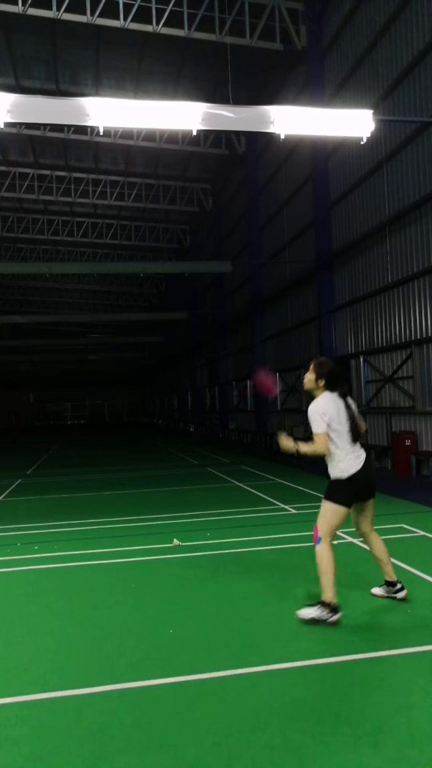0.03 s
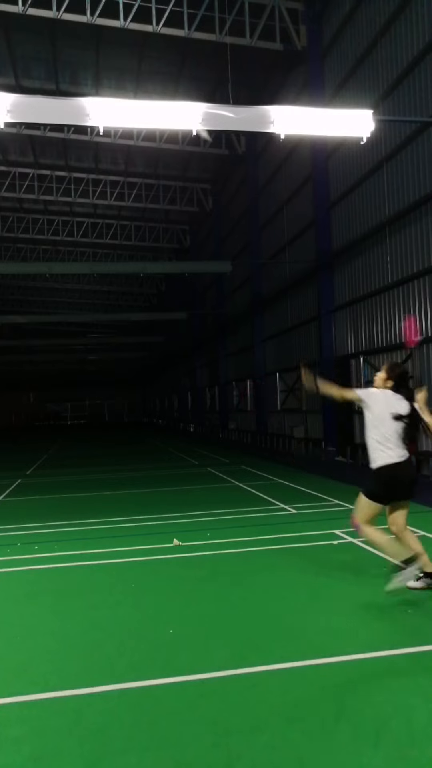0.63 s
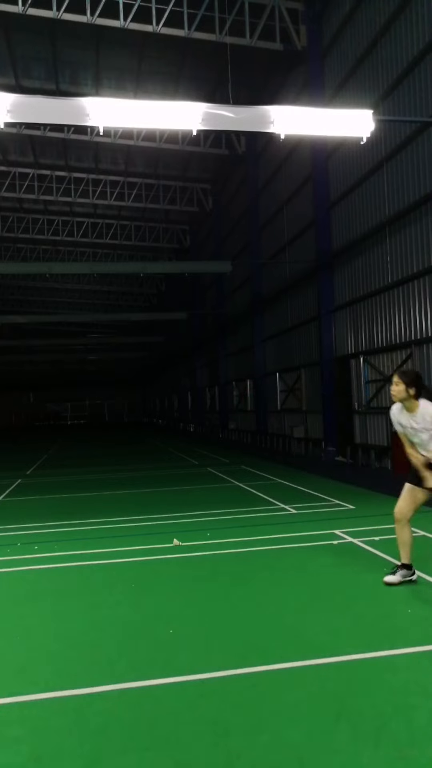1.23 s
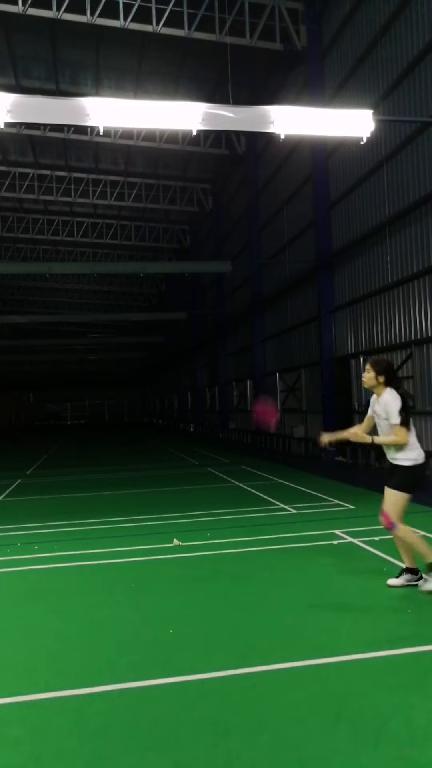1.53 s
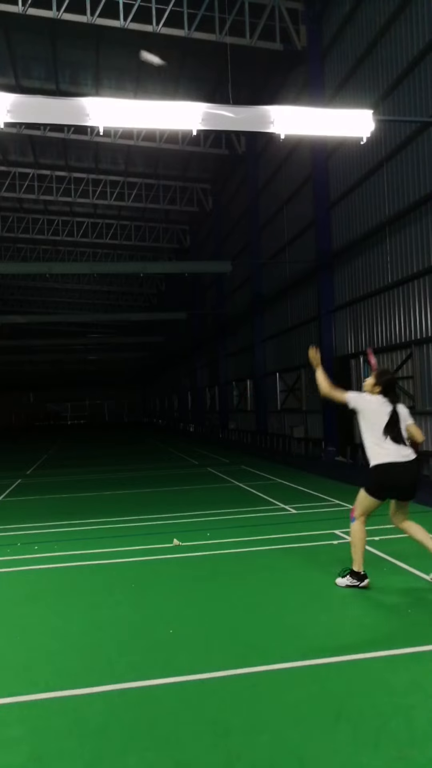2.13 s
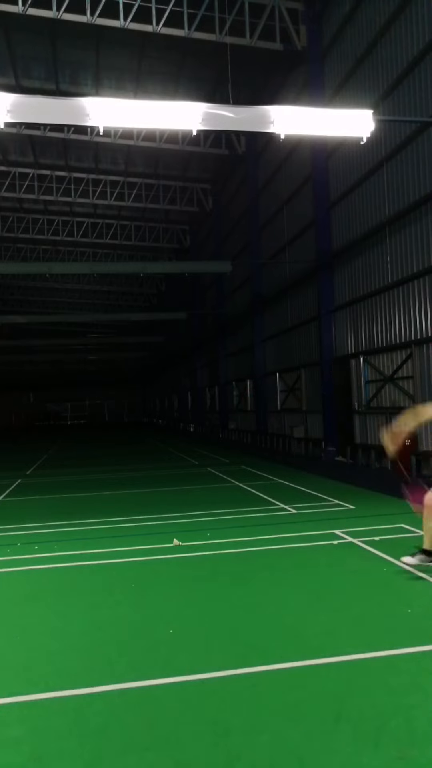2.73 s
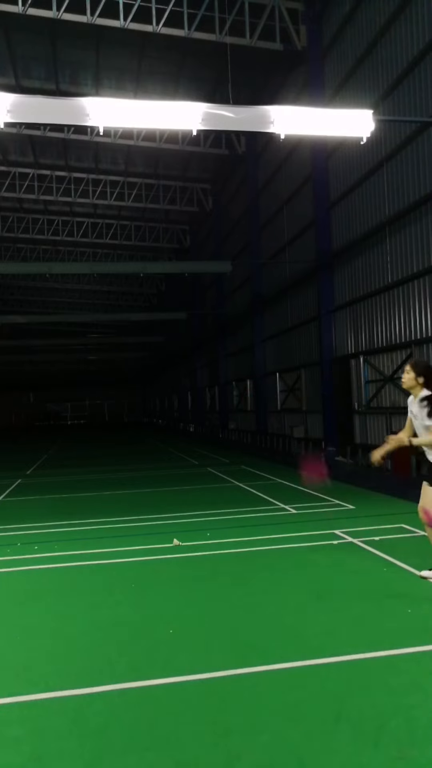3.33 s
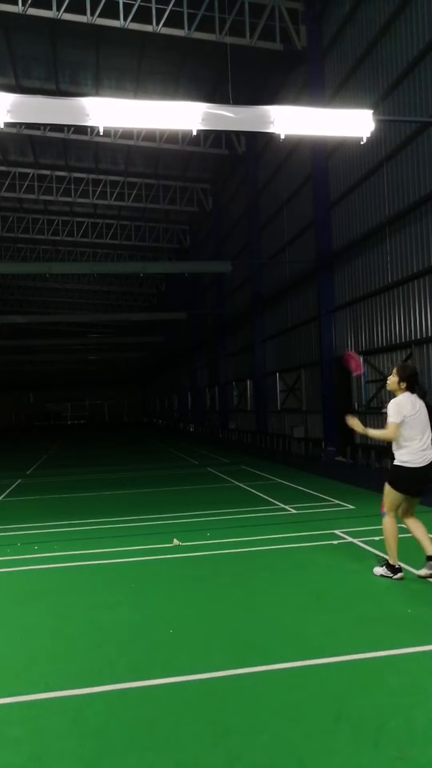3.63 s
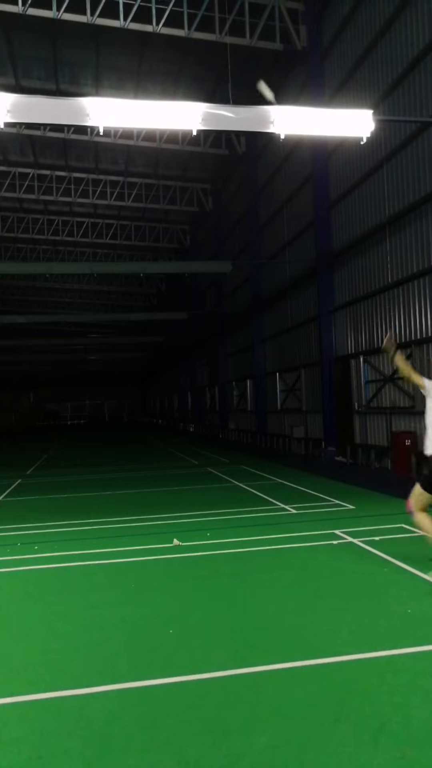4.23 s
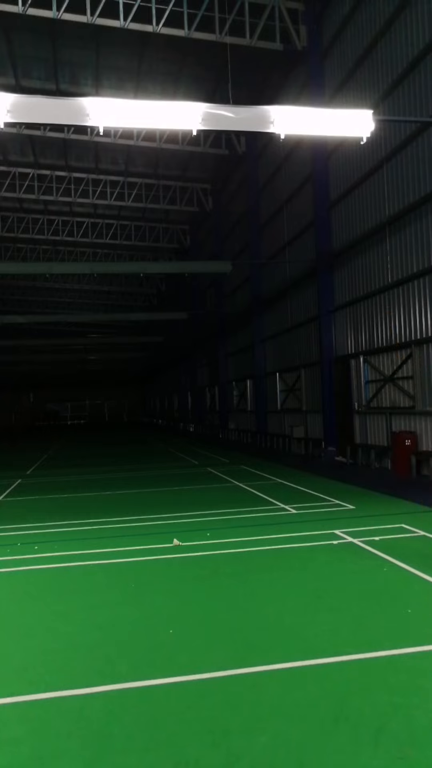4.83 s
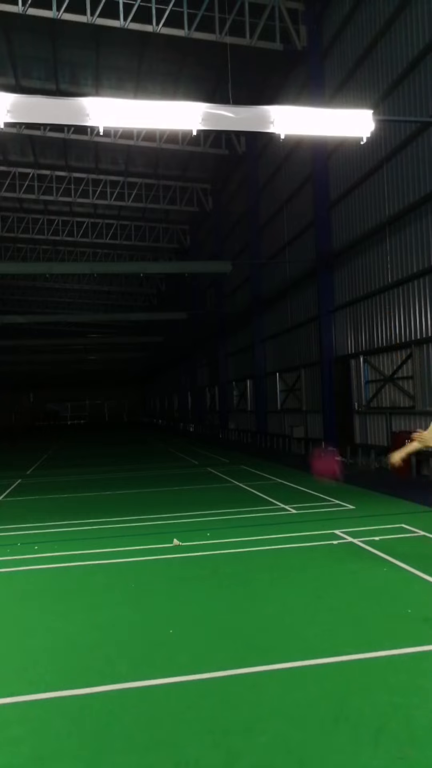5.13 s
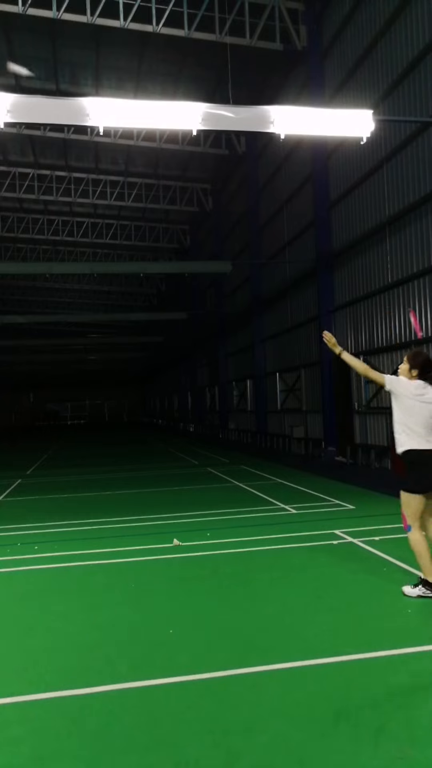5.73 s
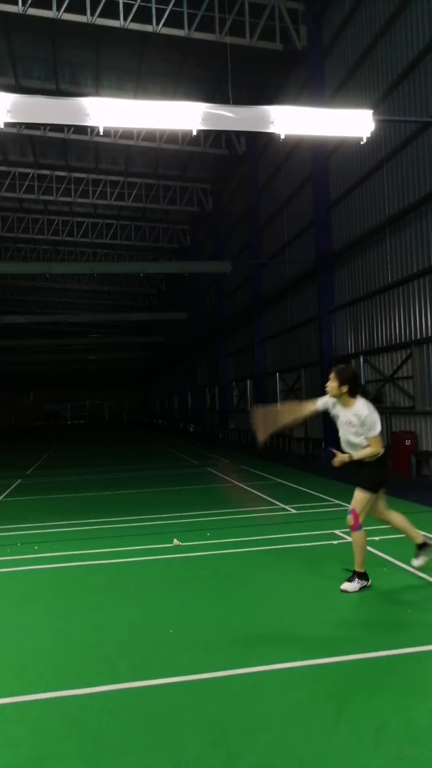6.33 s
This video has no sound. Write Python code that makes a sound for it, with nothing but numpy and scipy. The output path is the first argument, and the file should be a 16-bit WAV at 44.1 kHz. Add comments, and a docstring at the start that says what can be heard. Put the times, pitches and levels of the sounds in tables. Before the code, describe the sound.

Badminton practice in a large, reverberant indoor hall, over faint, steady, low room noise. It opens on the fading echo of an earlier hit and a light shoe scuff. A racket close to the microphone, slightly to the right, smashes a shuttlecock at about 1.0, 2.7, 4.6 and 6.4 seconds, the third loudest. Each is a sharp crack with a slight string ping, a quick slap off the walls and an echo lasting around two seconds. Softer, duller hits come from a distant racket at about 1.4, 3.2 and 5.1 seconds, the middle one with a thin ring. Faint, far-off shoe squeaks sound around 1.6 and 2.1 seconds. Spent shuttlecocks tap the court lightly, twice near 2.4 seconds and more faintly at 4.4. Quiet shoe scuffs and dull footfalls fall between the strokes, mainly around 3.3 seconds and from 5 to 6 seconds.

```python
"""Badminton smash practice in a steel-clad hall.

Two microphones stand near the court, the player a little to their right. From afar a feeder lifts
shuttles; close by, the racket swishes, cracks on the cork and its strings ping. Floor and walls slap
back and the big hall rings on. Shoes scuff and squeak, footfalls and echoes thud dully, and spent
shuttles tap the court, over a faint room noise."""
import sys
import numpy as np
from scipy import signal
from scipy.fft import rfft, irfft
from scipy.io import wavfile
from scipy.ndimage import uniform_filter1d

SR = 44100
rng = np.random.default_rng(int(sys.argv[2]) if len(sys.argv) > 2 else 0)


def digitize_waveform(pressure):
    """Quantize a signal to 16-bit integers and store it at the path in sys.argv[1].

    Rows of a 2-D input are taken as channels; values are limited to [-1, 1].
    """
    field = np.atleast_2d(pressure).T
    bounded = np.clip(field, -1, 1)
    quanta = np.round(bounded * 32767).astype(np.int16)
    wavfile.write(sys.argv[1], SR, quanta)


N = 281799
T = np.arange(SR // 2) / SR   # time within one stroke
LEAD_S = .06   # contact comes this far into a stroke


def from_db(db):
    """Decibels to gain."""
    return 10 ** (np.asarray(db) / 20)


def at_hz(curve, hz):
    """A curve's value, read on a log-frequency axis."""
    freqs, values = np.transpose(curve)
    return np.interp(np.log(hz + 1), np.log(freqs), values)


def add(out, sound, start_s):
    """Mix a sound into both channels from start_s."""
    at = int(round(start_s * SR))
    first, last = max(at, 0), min(at + sound.shape[1], N)
    if last > first:
        out[:, first:last] += sound[:, first - at:last - at]


def coloured(x, spectrum):
    """Causal (minimum-phase) filter with the given spectrum."""
    n = 2 * len(x)
    gain = from_db(at_hz(spectrum, np.fft.rfftfreq(n, 1 / SR)))
    cepstrum = irfft(np.log(gain))
    cepstrum[1:n // 2] *= 2
    return irfft(rfft(x, n) * np.exp(rfft(cepstrum[:n // 2], n)))[:len(x)]


def lowpass(x, hz):
    """Take off the treble."""
    return signal.sosfilt(signal.butter(2, hz, fs=SR, output="sos"), x)


def highpass(x, hz):
    """Gently thin the bass."""
    return signal.sosfilt(signal.butter(1, hz, "high", fs=SR, output="sos"), x)


def resonance(x, hz, boost_db, q):
    """Lift one broad band."""
    return x + (from_db(boost_db) - 1) * signal.lfilter(*signal.iirpeak(hz, q, fs=SR), x)


def ring(hz, t60):
    """One mode, struck at the moment of contact."""
    t = T - T[round(LEAD_S * SR)]
    return (t >= 0) * np.cos(2 * np.pi * hz * t) * from_db(-60 * np.abs(t) / t60)


def modes(table, pitch_hz):
    """All modes of a struck part."""
    return sum(from_db(db) * ring(ratio * pitch_hz, t60) for ratio, db, t60 in table)


# diffuse sound at the two microphones: (frequency [Hz], coherence [0-1])
MIC_COHERENCE = [(100, .998), (200, .98), (400, .55), (800, .35), (3000, .35), (9000, .45)]
def diffuse(seconds, gain_at, size=512):
    """Stereo noise; above the bass, the shared part reaches the left channel 0.6 ms later."""
    hz = np.fft.rfftfreq(size, 1 / SR)[:, None]
    t = np.arange(int(seconds * SR * 2 / size) + 3) * size / 2 / SR
    right, independent = rng.standard_normal((2, len(hz), 2 * len(t))).view(complex)
    alike = at_hz(MIC_COHERENCE, hz)
    lag_s = .00059 * hz / np.hypot(hz, 250)
    left = alike * np.exp(-2j * np.pi * hz * lag_s) * right + np.sqrt(1 - alike ** 2) * independent
    return signal.istft(np.array([left, right]) * gain_at(hz, t))[1] * np.sqrt(3 / size)


# the hall's background at the microphones: (frequency [Hz], level [dB])
ROOM_TONE_SPECTRUM = [(20, -46), (50, -43), (100, -43.5), (200, -46), (400, -50.3), (800, -55), (1600, -59),
                      (3200, -62.8), (5500, -68.7), (9000, -68), (11500, -76), (15000, -79), (16000, -93)]
def room_tone():
    """Faint, steady, mostly low noise all round the microphones."""
    return diffuse(N / SR, lambda hz, t: from_db(at_hz(ROOM_TONE_SPECTRUM, hz)), size=4096)[:, :N]


# the hall's reverberation, heard from the court: (frequency [Hz], level [dB])
HALL_SPECTRUM = [(100, -30.3), (215, -25.1), (330, -29.3), (520, -30.2), (750, -28.4), (1000, -27.7),
                 (1400, -30.3), (2050, -29), (2700, -31.3), (4000, -30), (6000, -30.5), (9000, -29.1),
                 (12000, -30.8), (16000, -33)]
def hall_decay(hz, t, near_t60=2.05, far_t60=4.6):
    """The sound near the court dies first; the far end lingers; air absorbs the treble."""
    air = 1 + (hz / 10500) ** 1.5
    near = from_db(-60 * t * air / near_t60)
    far = from_db(-14.7 - 60 * t * air / far_t60) / np.hypot(1, hz / 4800)
    return from_db(at_hz(HALL_SPECTRUM, hz)) * np.hypot(near, far)


def hall_tail(x, roof_s, early_db, far_walls_db):
    """The tail swells as the roof's scatter arrives, is fed again by the far walls, then drops."""
    tail = diffuse(2.7, hall_decay)
    t = np.arange(tail.shape[1]) / SR
    gains = from_db([early_db, early_db, 0, far_walls_db, far_walls_db - 1.2])
    swell = np.interp(t, [0, .006, roof_s * .75, roof_s, .38, .56], [0, *gains])
    return signal.fftconvolve(x[None], tail * swell, axes=1)


def echoes(x, paths):
    """Carry a sound along each path to the microphones; ribbed cladding smears it a little."""
    n, response = 2 * len(T), 0
    hz = np.fft.rfftfreq(n, 1 / SR)
    for delay_s, level_db, dull_hz, lag_s, smear_s in paths:
        scatter = rng.standard_normal(len(T)) * (T > 0) + 3 * (T == 0)
        scatter *= np.exp(-np.minimum(T / smear_s, 20))
        surface = rfft(scatter / np.linalg.norm(scatter), n) / (1 + 1j * hz / dull_hz)
        travel = np.exp(-2j * np.pi * hz * np.array([[delay_s], [delay_s + lag_s]]))
        response = response + from_db(level_db) * travel * surface
    return irfft(rfft(x, n) * response)


def squeak(start_s, pitch_hz, level_db, hold_s, overtones_db):
    """Rubber sticks and slips on the mat: three wavering harmonics that sag and die away."""
    attack_s, release_s, sag_hz_per_s, fade_db_per_s = .04, .6, 70, 8
    t = np.clip(np.arange(N) / SR - start_s, 0, hold_s + release_s)
    pressure = np.clip(np.minimum(t / attack_s, 1 - (t - hold_s) / release_s), 0, 1)
    slip = uniform_filter1d(rng.standard_normal(N), size=60)   # the rubber's grip wavers
    hz = (pitch_hz - sag_hz_per_s * t) * (1 + .42 * slip)
    phase = 2 * np.pi * np.cumsum(hz) / SR
    overtones = .47 * np.sin(2 * phase) + .16 * np.sin(3 * phase)
    tone = .45 * np.sin(phase) + from_db(overtones_db) * overtones
    return pressure * from_db(level_db - fade_db_per_s * t) * tone


# soles far down the hall: (time [s], pitch [Hz], level [dB], hold [s], overtones [dB])
FAR_SQUEAKS = [(1.6, 2230, -57.5, .42, -.5), (2.05, 2430, -62, .3, -14)]
# a sole's rub on the court mat: (frequency [Hz], level [dB])
SCUFF_SPECTRUM = [(200, -6), (1000, -1), (2600, 1), (5000, -3), (9300, 2), (11000, -5), (15000, -11)]
# soles brushing the mat: (time [s], level [dB], decay [s])
SHOE_SCUFFS = [(-.13, -39.5, .07), (.262, -47.5, .03), (2.346, -53, .035), (2.376, -50, .015),
               (3.25, -41, .075), (5.12, -43, .05), (5.535, -57, .015), (5.838, -60, .02),
               (5.90, -59.5, .22), (6.178, -58, .02)]
# dull low thuds, footfalls and echoes just after the feeder's strokes: (time [s], level [dB], pitch [Hz])
LOW_THUDS = [(.44, -55, 375), (.715, -58, 375), (.875, -58, 375), (1.503, -46, 420), (3.315, -45, 330),
             (3.346, -44.5, 440), (3.414, -45, 460), (4.105, -51, 400), (5.53, -49.5, 375),
             (5.84, -53, 375), (6.15, -53, 400)]
def shoes_and_thuds():
    """Soles rub on the mat and dull thuds sound, centred; far squeaks arrive only as reverberation."""
    near, t = np.zeros((2, N)), np.arange(SR) / SR
    for s, level_db, decay_s in SHOE_SCUFFS:
        rub = rng.standard_normal(SR) * np.minimum(t / .003, 1) * np.exp(-t / decay_s)
        add(near, from_db(level_db) * coloured(rub, SCUFF_SPECTRUM)[None], s)
    for s, level_db, pitch_hz in LOW_THUDS:
        bass = from_db(-4) * (ring(hz=110, t60=.03) + ring(hz=205, t60=.05))
        thud = lowpass(bass + from_db(4) * ring(pitch_hz, t60=.04), hz=600)
        add(near, from_db(level_db) * thud[None], s - LEAD_S)
    far = sum(squeak(*row) for row in FAR_SQUEAKS)
    tail = hall_tail(from_db(-6) * near[0] + far, roof_s=.05, early_db=-3, far_walls_db=0)
    return near + tail[:, :N]


def cork_knock(hz, boost_db):
    """The snap of contact, coloured by one broad resonance of the cork."""
    snap = 1. * (np.arange(len(T)) == round(LEAD_S * SR))
    return resonance(snap, hz, boost_db, q=1.7)


def feather_rattle(decay_s, build_s, low_hz):
    """Feathers clatter on the strings for a few milliseconds."""
    t = T - LEAD_S
    clatter = highpass(rng.standard_normal(len(T)), low_hz)
    return clatter * np.exp(-np.maximum(t / decay_s, -t / build_s))


# a light contact, some way off: (frequency [Hz], level [dB])
SOFT_HIT_SPECTRUM = [(30, -36), (70, -16), (170, 3), (320, 6), (650, .5), (1200, .5), (2500, -3),
                     (5000, -2.5), (8000, 0), (11000, -6), (15000, -16)]
def soft_hit(x):
    """The tone of a gently struck shuttle, fullest in the low mids."""
    return coloured(x, SOFT_HIT_SPECTRUM)


# from the feeder's distance, direct and by floor, walls, roof and beams:
# (delay [s], level [dB], dull above [Hz], right microphone's lag [s], smear [s])
FAR_PATHS = [(0, -.5, 9000, .000035, .00001), (.0011, -2, 2200, .00005, .0002),
             (.0235, -8, 3000, -.0003, .0015), (.032, -8, 700, .0001, .0005),
             (.041, -11, 1500, -.0002, .001), (.056, -10, 2500, .0002, .002),
             (.097, -7, 1200, .00005, .003), (.130, -12, 1200, -.0002, .003),
             (.171, -11, 1400, .0001, .004)]
def from_afar(x):
    """A distant contact reaches the microphones with its first reflections."""
    return echoes(x, FAR_PATHS)


# spent shuttles landing some way off: (time [s], level [dB])
SHUTTLE_DROPS = [(2.3825, -27), (2.400, -32), (4.375, -40)]
def shuttle_drops():
    """A falling shuttle's cork taps the court."""
    out = np.zeros((2, N))
    for s, level_db in SHUTTLE_DROPS:
        tap = from_db(level_db) * soft_hit(cork_knock(hz=2400, boost_db=10))
        add(out, from_afar(tap), s - LEAD_S)
        add(out, hall_tail(tap, roof_s=.03, early_db=-6, far_walls_db=-2), s - LEAD_S)
    return out


# a string bed's main and higher modes: (ratio to pitch [x], level [dB], t60 [s])
BED_MODES = [(1, 0, .11), (.94, -6, .06), (.87, -10, .06), (1.04, -7, .07), (1.12, -16, .05)]
BED_OVERTONES = [(1.58, -4, .045), (1.97, -2, .04), (2.08, -1, .035), (2.17, -3, .035), (2.6, -8, .04)]
def string_ping(pitch_hz, overtone_db):
    """The strings ring as the shuttle leaves; off-centre hits have stronger overtones."""
    return modes(BED_MODES, pitch_hz) + from_db(overtone_db) * modes(BED_OVERTONES, pitch_hz)


# the feeder's racket, its low thump: (ratio to pitch [x], level [dB], t60 [s])
RACKET_THUMP = [(1, 0, .014), (1.45, -7, .012), (2.1, -5, .012)]
# its frame's ring: (frequency [Hz], level [dB], t60 [s])
RACKET_FRAME = [(3270, -13, .06), (3335, 3, .12), (3395, -3, .08), (3490, -12, .05)]
# strokes far from the microphones: (time [s], crack [dB], cork knock [Hz], knock boost [dB],
# string pitch [Hz], strings [dB], overtones [dB re strings], frame [dB], thump [Hz], thump [dB re crack])
FEEDER_LIFTS = [(-.26, -9.5, 680, 4, 1100, -35, -3, -70, 380, -22),
                (1.449, -11.5, 560, 2.5, 1125, -29.5, -9, -70, 290, -14),
                (3.2177, -9.5, 820, 7.5, 1150, -41, -2, -43, 380, -14),
                (5.0972, -13, 1800, 2, 1100, -41, -12, -70, 250, -15)]
def lifts():
    """Softer strokes from the distant feeder; an off-centre one sets the frame ringing."""
    out = np.zeros((2, N))
    for (s, crack_db, knock_hz, knock_db, pitch_hz, string_db, overtone_db,
         frame_db, thump_hz, thump_db) in FEEDER_LIFTS:
        thump = from_db(crack_db + thump_db) * lowpass(modes(RACKET_THUMP, thump_hz), hz=650)
        crack = from_db(crack_db) * soft_hit(cork_knock(knock_hz, knock_db))
        rattle = feather_rattle(decay_s=.0015, build_s=.0006, low_hz=1800)
        feathers = from_db(crack_db - 10) * soft_hit(rattle)
        ping = from_db(string_db) * string_ping(pitch_hz, overtone_db)
        frame = sum(from_db(frame_db + db) * ring(hz, t60) for hz, db, t60 in RACKET_FRAME)
        add(out, from_afar(crack + feathers + ping + thump + frame), s - LEAD_S)
        spread = crack + from_db(-8) * ping + from_db(-5) * frame + from_db(-12) * thump
        tail = hall_tail(spread, roof_s=.028, early_db=-7, far_walls_db=0)
        add(out, from_db(-.3) * tail, s - LEAD_S)
    return out


# a smash at close range: (frequency [Hz], level [dB])
HARD_HIT_SPECTRUM = [(50, -28), (130, -3), (260, 0), (700, 1.5), (1200, 0), (2300, -.5), (3200, -1.5),
                     (4200, -.5), (5400, -3), (6600, -.5), (9200, 1.3), (10800, -4.5), (14500, -12),
                     (16000, -24)]
def hard_hit(x):
    """The tone of a smash, nearly even from bass to high treble."""
    return coloured(x, HARD_HIT_SPECTRUM)


def swish(top_hz=1090, width_hz=140, rise_s=.021, fall_s=.007):
    """The frame sheds eddies at a pitch that follows its speed; the thin strings hiss."""
    t = T - LEAD_S + .005   # fastest just before contact
    speed = 1 / (1 + (t / np.where(t < 0, rise_s, fall_s)) ** 2 / 2)
    eddies = lowpass(rng.standard_normal((2, len(T))), width_hz)
    phase = 2 * np.pi * np.cumsum(top_hz * speed ** .7) / SR
    tone = (eddies[0] * np.cos(phase) + eddies[1] * np.sin(phase)) / eddies.std()
    hiss = from_db(1.5) * hard_hit(rng.standard_normal(len(T)))
    return tone * speed ** 3.5 + hiss * speed ** 4


def bed_push(half_dwell_s=.00028):
    """The string bed gives way under the cork and springs back: one swing of pressure."""
    t = (T - LEAD_S) / half_dwell_s
    return -t * np.exp(-np.minimum(t * t / 2, 20))


def wall_slaps(x, side_s, side_db, back_db):
    """Side and back walls return a hollow clack: their thin steel rings and lets the bass through."""
    clack = resonance(highpass(x, hz=280), hz=1420, boost_db=6, q=2)
    side = (side_s, side_db, 2100, .00004, .0007)   # columns as in NEAR_PATHS
    back = (.0595, back_db, 1600, .00004, .0004)
    return echoes(clack, [side, back])


# from the player, direct and by floor, mat, cladding, roof and beams:
# (delay [s], level [dB], dull above [Hz], right microphone's lag [s], smear [s])
NEAR_PATHS = [(0, -.3, 13000, .000033, .00001), (.0031, -2, 15000, -.0002, .00005),
              (.0049, -10, 12000, -.0001, .0016), (.0235, -11, 7000, .0002, .003),
              (.0335, -12, 2000, -.0003, .001), (.093, -10, 4000, -.0004, .003),
              (.115, -12, 4000, .0003, .008), (.139, -13, 3000, -.0004, .008),
              (.174, -13, 3000, .0002, .008)]
# strokes near the microphones: (time [s], crack [dB], cork knock [Hz], knock boost [dB],
# string pitch [Hz], strings [dB], overtones [dB re strings], push [dB re crack], feathers [dB re crack],
# swish [dB re crack], side wall delay [s], side wall [dB], back wall [dB])
PLAYER_SMASHES = [(-.80, -3, 2300, 4, 1130, -40, -10, -19, -12, -43, .0164, -3, -3),
                  (.9925, 1.2, 1400, 7.5, 1170, -29.5, -18, -17.5, -11, -40, .0168, -2.5, 1.5),
                  (2.6973, .3, 1650, 4.2, 1120, -43, 1.5, -15, -10.5, -43.5, .0151, -4, -4.5),
                  (4.6412, 2.3, 2300, 5, 1150, -27.5, -9.5, -18.5, -9.5, -43, .0162, -2, .5),
                  (6.3688, -1.5, 1350, 6.5, 1160, -36, -18, -15, -9, -43, .0174, -1.5, -3)]
def smashes():
    """Swish, crack, thwack of the loaded strings, rattle and ping; the hall takes up mostly the crack."""
    out = np.zeros((2, N))
    pan_right = from_db([[-.7], [.7]])
    for (s, crack_db, knock_hz, knock_db, pitch_hz, string_db, overtone_db,
         push_db, feathers_db, swish_db, side_s, side_db, back_db) in PLAYER_SMASHES:
        crack = from_db(crack_db) * hard_hit(cork_knock(knock_hz, knock_db))
        rattle = feather_rattle(decay_s=.0028, build_s=.0005, low_hz=6500)
        feathers = from_db(crack_db + feathers_db) * hard_hit(rattle)
        push = from_db(crack_db + push_db) * bed_push()
        thwack = from_db(crack_db - 26) * ring(1.15 * pitch_hz, t60=.009)
        air = from_db(crack_db + swish_db) * swish()
        ping = from_db(string_db) * string_ping(pitch_hz, overtone_db)
        stroke = push + air - crack - thwack - feathers
        near = echoes(stroke - ping, NEAR_PATHS)
        walls = wall_slaps(stroke - from_db(-8) * ping, side_s, side_db, back_db)
        add(out, (near + walls) * pan_right, s - LEAD_S)
        spread = crack + from_db(-22) * push + from_db(-7) * ping
        tail = hall_tail(spread, roof_s=.085, early_db=-4, far_walls_db=4)
        add(out, from_db(.2) * tail, s - LEAD_S)
    return out


def scene():
    """The hall's steady noise under the play, which is a little louder in the right microphone."""
    room = room_tone()
    play = smashes() + lifts() + shuttle_drops() + shoes_and_thuds()
    return room + play * from_db([[-.8], [.8]])


def record(dry):
    """The highest peaks are rounded, the top is cut."""
    cutoff_hz = 15800
    return signal.sosfilt(signal.ellip(10, .2, 80, cutoff_hz, fs=SR, output="sos"), np.tanh(dry))


dry = scene()
out = record(dry)
digitize_waveform(out)
```